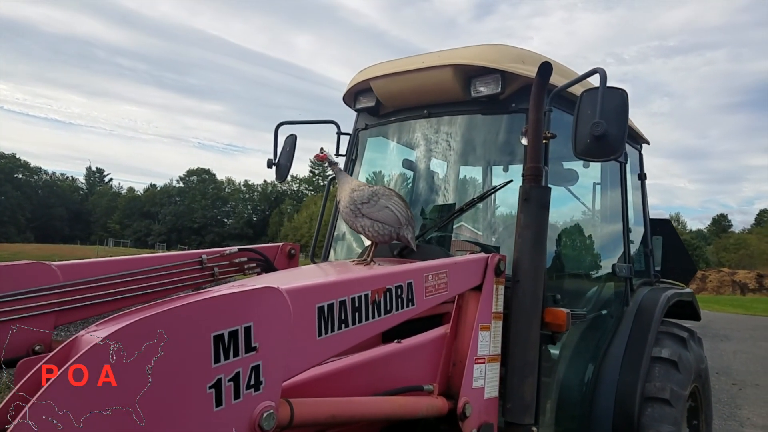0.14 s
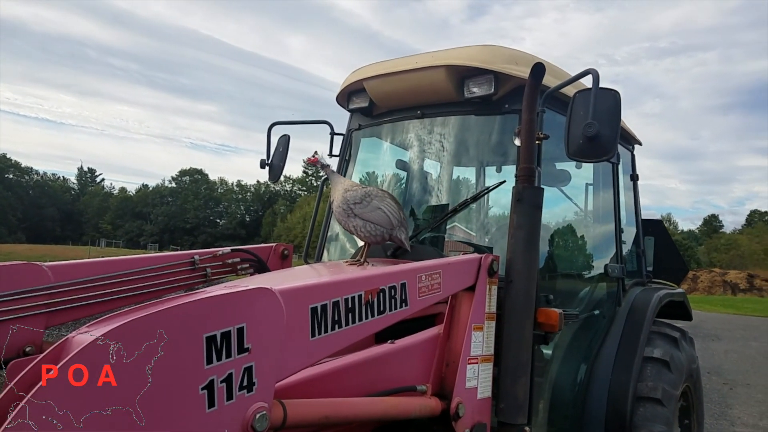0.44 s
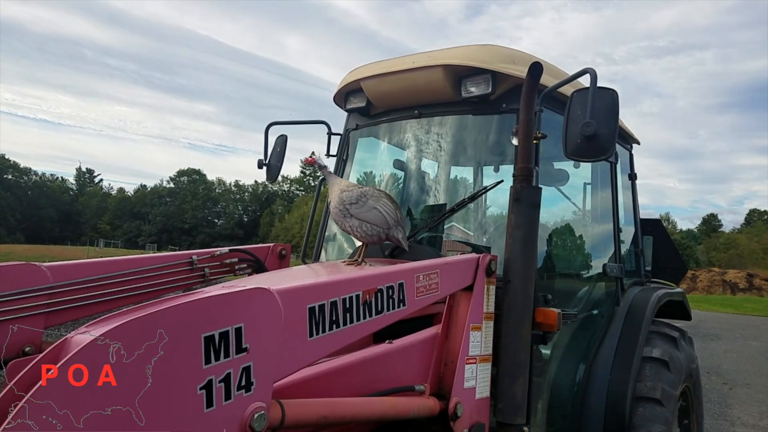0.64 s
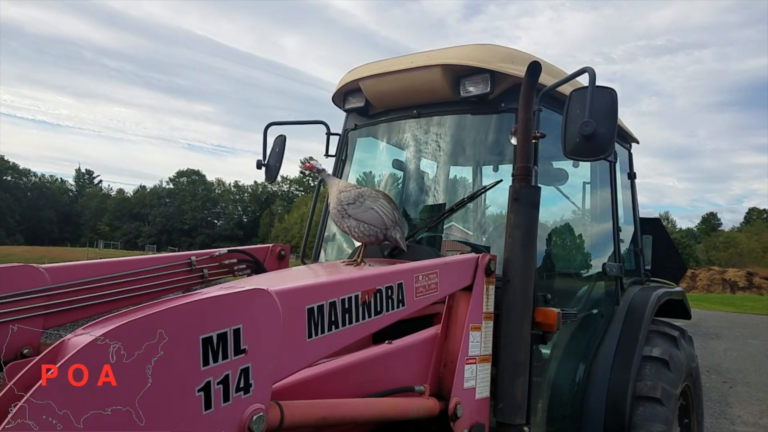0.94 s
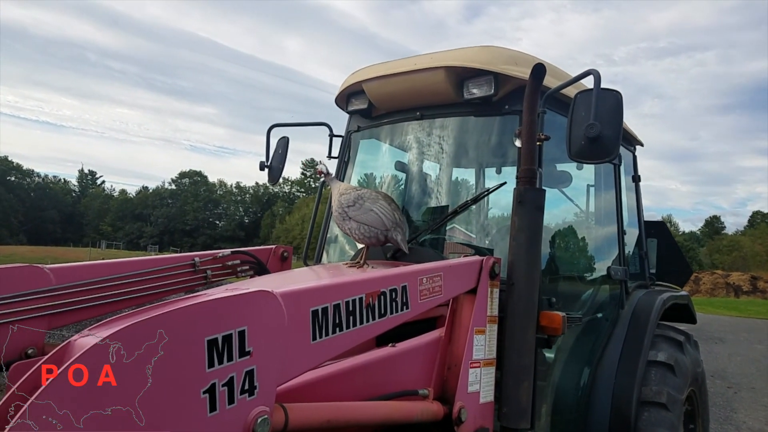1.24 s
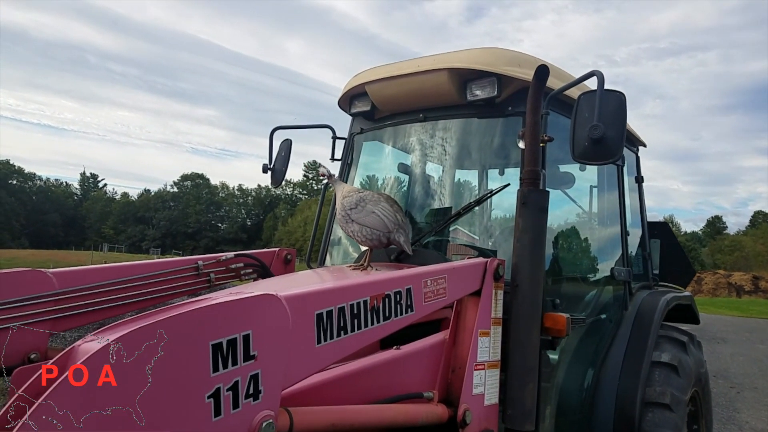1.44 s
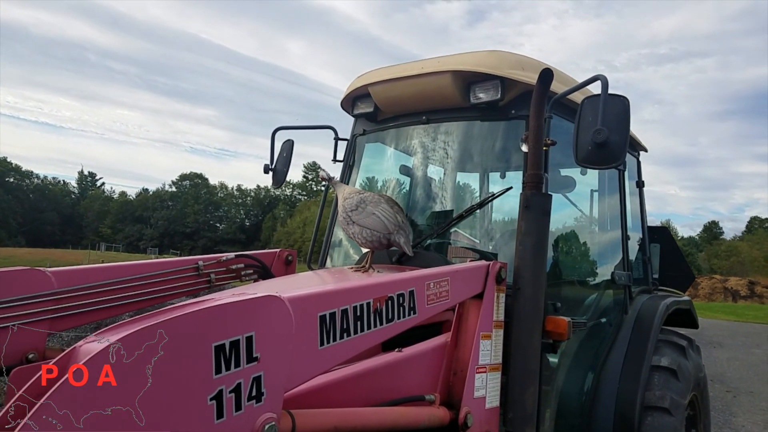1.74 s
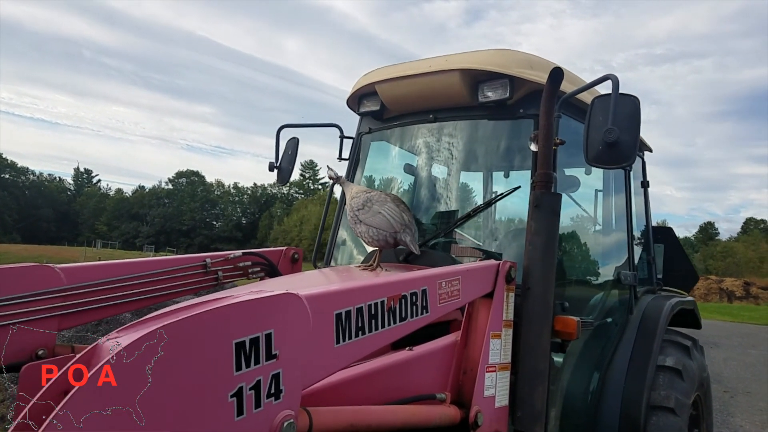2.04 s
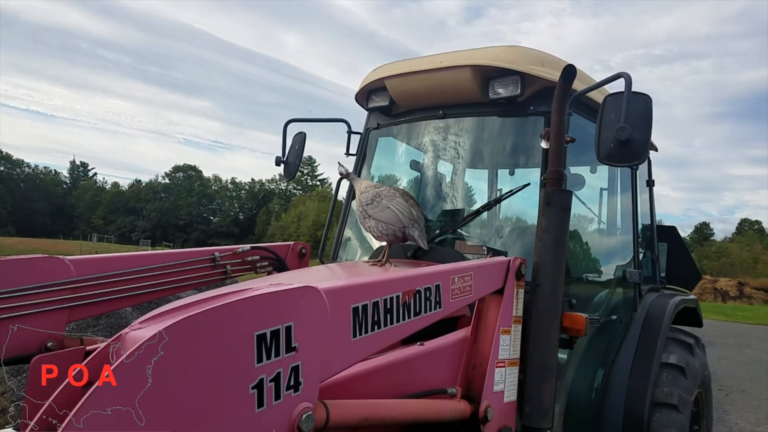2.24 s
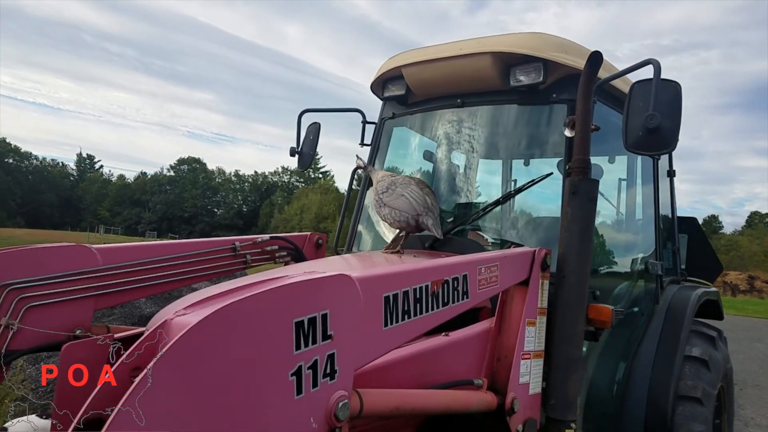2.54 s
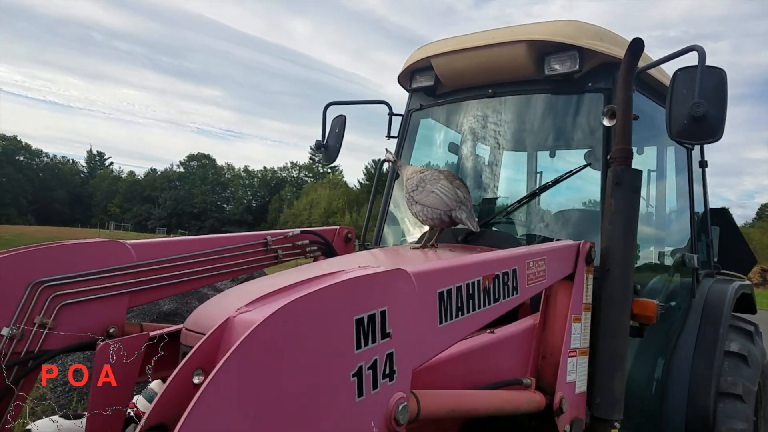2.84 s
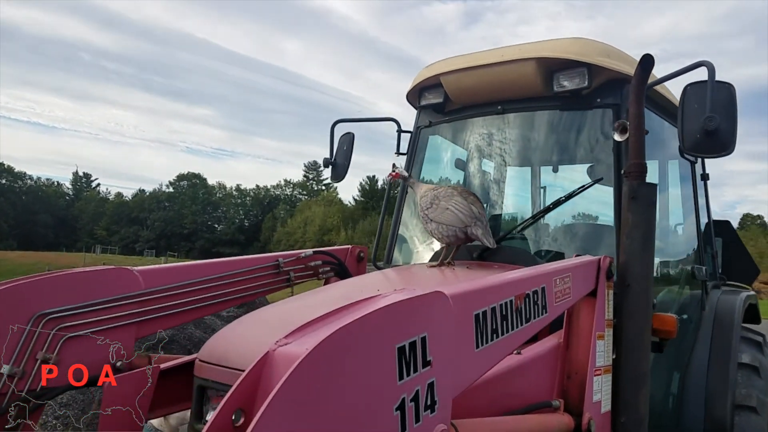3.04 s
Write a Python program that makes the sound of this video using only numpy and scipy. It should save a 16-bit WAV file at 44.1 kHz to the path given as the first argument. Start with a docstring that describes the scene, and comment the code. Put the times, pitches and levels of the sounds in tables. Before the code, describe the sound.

Single guinea hen calling outdoors in clipped, shrill, buzzy squawks, the first ones opening with a squeak; soft wind rumble nudges the stereo microphone mainly between calls in the first half, over a faint countryside hush.

```python
"""A guineafowl perched on a parked tractor gives eight short, harsh squawks.
Its voice has two oscillators, a high whistle and a low buzz that shakes it into a rasp, shaped by the throat.
Each call is led in by a hiss of air and opens on a falling squeak.
Cab and bonnet scatter the calls to the microphone's two ports, and the yard answers faintly.
A light wind nudges the microphone over a steady distant countryside hush with two faint ticks."""
import sys
import numpy as np
from scipy import signal
from scipy.fft import rfft, irfft, next_fast_len
from scipy.io import wavfile
from scipy.ndimage import map_coordinates

SR = 44100
rng = np.random.default_rng(int(sys.argv[2]) if len(sys.argv) > 2 else 0)


def persist_wave(psi):
    """Save psi, clipped to +-1, as 16-bit WAV."""
    counts = np.round(np.clip(psi, -1, 1) * 32767).astype(np.int16)
    wavfile.write(sys.argv[1], SR, np.atleast_2d(counts).T)


N = 141120  # samples, 3.2 s
T = np.arange(N) / SR
CALL_T = np.arange(SR // 6) / SR  # room for one squawk, s
OPPOSITE = np.array([[1], [-1]])  # a side signal enters the two ports in opposite sense


def undb(db):
    """Decibels to gain."""
    return 10 ** (np.asarray(db) / 20)


def unit(x):
    """Scale to rms 1."""
    return x / np.sqrt(np.mean(x ** 2) + 1e-18)


def ramp(x):
    """Smooth step from 0 to 1."""
    return np.sin(np.pi / 2 * np.clip(x, 0, 1)) ** 2


def bump(x, at, span):
    """Bell curve of height 1."""
    return np.exp(-((x - at) / span) ** 2)


def turn(hz):
    """Phase in radians of an oscillator following a pitch track."""
    return 2 * np.pi * np.cumsum(hz) / SR


def wobble(size, hz):
    """Smooth random motion of spread 1, with hz new random points a second."""
    at = np.arange(size) * hz / SR
    return unit(map_coordinates(rng.standard_normal(4096), [at], mode="wrap"))


def lowpass(x, hz):
    """Keep what lies below hz, without delay."""
    return signal.sosfiltfilt(signal.butter(2, hz, fs=SR, output="sos"), x)


def colour(x, points, extra=lambda f: 0):
    """Causal (minimum-phase) filter through (Hz, dB) points, with an optional further dB curve."""
    size = 2 * next_fast_len(x.shape[-1])
    f = np.arange(size // 2 + 1) * SR / size
    hz, db = np.array(points, float).T
    curve_db = np.interp(np.log(f + 1), np.log(hz), db) + extra(f)
    # folding the cepstrum onto positive time makes the filter causal
    cepstrum = irfft(np.log(undb(curve_db)))
    cepstrum[1:size // 2] *= 2
    cepstrum[size // 2 + 1:] = 0
    response = np.exp(rfft(cepstrum))
    return irfft(rfft(x, size) * response)[..., :x.shape[-1]]


def coloured_air(points):
    """Noise of rms 1, separate at each port, through (Hz, dB) points."""
    return unit(colour(rng.standard_normal((2, N)), points))


def level_over_call(x, db, length):
    """Set the level in dB, counting the energy over the call's length."""
    return undb(db) * unit(x) * np.sqrt(length * SR / len(x))


def add(out, x, start):
    """Mix a sound in at its start time, losing what falls before the beginning."""
    i = int(start * SR)
    x, i = x[max(-i, 0):], max(i, 0)
    out[i:i + len(x)] += x[:len(out) - i]


# colour of the escaping breath: pitch_hz, level_db
HISS_COLOUR = [(1500, -32.5), (2700, -21), (3300, -8.5), (4300, -9.5), (5000, -24.5), (12000, -39.5)]
HISS_LEAD_S, HISS_DB = 0.017, -41  # level before the fades


def hiss():
    """Air escapes just before the voice catches: a short faded burst of coloured noise."""
    t = np.arange(SR // 16) / SR
    breath = unit(colour(rng.standard_normal(len(t)), HISS_COLOUR))
    return undb(HISS_DB) * breath * ramp(t / 0.0052) * ramp((t[-1] - t) / .02)


SQUEAK_HZ, SQUEAK_FALL_HZ_PER_S, SQUEAK_JITTER = 3004, 9000, 0.037  # pitch at the peak; jitter as a share
SQUEAK_AT_S, SQUEAK_SPREAD_S = 0.012, 0.011


def squeak(squeak_db):
    """A brief falling, jittery tone that opens the call."""
    t = CALL_T
    falling = SQUEAK_HZ - SQUEAK_FALL_HZ_PER_S * (t - SQUEAK_AT_S)
    tone = np.sin(turn(falling * (1 + SQUEAK_JITTER * wobble(len(t), 1000))))
    swell = bump(t, SQUEAK_AT_S, SQUEAK_SPREAD_S) * ramp(t / .001)
    return np.sqrt(2) * undb(squeak_db) * tone * swell


ARCH_AT, ARCH_WIDTH, SAG_FROM, SAG_TO = .48, .2, .66, 1.1  # shares of the call's length
# pitch jitter as shares, the first two per unit roughness
JITTER, WHISTLE_JITTER, BUZZ_JITTER = 0.1006, .03, 0.03
JITTER_HZ = 894.8  # random points a second behind the rasp
SHAKE_RAD, SHAKE_DEPTH = .8, .7  # buzz on the pulses; the phase shake is per unit roughness
DOUBLING_RAD, DOUBLING_DEPTH = 0.85, .5
AIR_GAIN = 2 * undb(-11)  # noise among the pulses, per unit roughness


def oscillators(u, effort, hz, arch, drop, buzz_hz, rough):
    """The whistle's pitch arches and sags; the buzz shakes its pulses and alternate cycles grow unequal."""
    size = len(u)
    sag = 1 - drop * ramp((u - SAG_FROM) / (SAG_TO - SAG_FROM))
    pitch = hz * (1 + arch * effort) * sag
    clean = turn(pitch * (1 + WHISTLE_JITTER * rough * wobble(size, 400)))
    high = turn(pitch * (1 + JITTER * rough * wobble(size, JITTER_HZ)))
    low = turn(buzz_hz * np.sqrt(sag) * (1 + BUZZ_JITTER * wobble(size, 230)))
    # motion at half the whistle pitch makes alternate cycles unequal
    doubling = ramp(u / 0.35)
    shaken = high + SHAKE_RAD * rough * np.sin(low) + DOUBLING_RAD * doubling * np.sin(high / 2)
    gate = (1 + SHAKE_DEPTH * np.cos(low)) * (1 + DOUBLING_DEPTH * doubling * np.cos(high / 2))
    pulses = unit(sum(np.cos(k * shaken) for k in range(1, 12)))
    source = gate * (pulses + AIR_GAIN * rough * rng.standard_normal(size))
    return clean, low, source


# level of each buzz harmonic against the call's buzz_db: level_db
BUZZ_HARMONICS = [-4.5, -10.5]
# tones one buzz step below the whistle and one to three above, against SIDEBAND_DB: level_db
SIDEBANDS = [-8.5, -11, -8.5, -6]
SIDEBAND_DB = -25  # per unit roughness
WHISTLE_FADE_DB = 2  # fall over the call's length


def clear_tones(u, clean, low, whistle_db, buzz_db, rough, fade, push):
    """The plain whistle and buzz, with sidebands where the two oscillators combine."""
    whistle = undb(whistle_db - WHISTLE_FADE_DB * (u - .5)) * np.sin(clean)
    harmonics = enumerate(BUZZ_HARMONICS, start=1)
    buzz = undb(buzz_db) * sum(undb(db) * np.sin(k * low) for k, db in harmonics)
    steps = zip((-1, 1, 2, 3), SIDEBANDS)
    sidebands = sum(undb(db) * np.sin(clean + k * low) for k, db in steps)
    return np.sqrt(2) * (fade * (whistle + buzz) + undb(SIDEBAND_DB) * rough * push * sidebands)


# throat response: pitch_hz, level_db
THROAT_RESPONSE = [(300, -38.5), (520, -15), (680, -12.5), (820, -16.5), (1030, -7.5), (1170, -5),
                   (1290, -26), (1500, -15), (1700, -9), (1870, -5.5), (2000, -6), (2200, 4.5), (2560, 4),
                   (2770, -9), (3060, -0.5), (3360, -7.5), (3700, -1), (3950, -8.5), (4250, 6.5),
                   (4500, -12), (4850, -7.5), (5900, -14.5), (6750, -18.5), (9200, -20.5), (10200, -23),
                   (15500, -27.5)]
UPPER_HZ, UPPER_WIDTH_HZ, TREBLE_HZ = 4210, 908, 6050  # treble lift is complete at TREBLE_HZ
TREBLE_EFFORT_DB = 5.5  # treble lost at no effort


def throat_rasp(source, effort, push, upper_db, treble_db):
    """The throat filters the shaken pulses, brightest at full effort."""
    body = lowpass(source, UPPER_HZ)
    pressed = body + (source - body) * undb(TREBLE_EFFORT_DB * (effort - 1))

    def beak(f):
        upper = upper_db * bump(f, UPPER_HZ, UPPER_WIDTH_HZ)
        return upper + treble_db * ramp(2 * f / TREBLE_HZ - 1)

    return colour(pressed * push, THROAT_RESPONSE, beak)


RING_WIDTH_HZ = 220  # of each pass
LOW_RING_AT, LOW_RING_SPAN, HIGH_RING_SPAN = 0.67, 0.39, 0.32  # shares of the call's length


def throat_ring(source, hz):
    """A narrow throat resonance, applied twice for steep sides."""
    b, a = signal.iirpeak(hz, hz / RING_WIDTH_HZ, fs=SR)
    return unit(signal.lfilter(b, a, signal.lfilter(b, a, source)))


ATTACK_S, RASP_ATTACK_S = 0.002, .009
RELEASE_S, FADE_S = 0.02, 0.019  # fade-out before and after the nominal end


def squawk(length, hz, arch, drop, buzz_hz, rough, whistle_db, buzz_db, rasp_db, upper_db, treble_db,
           low_hz, low_db, high_hz, high_db, squeak_db):
    """A squeak opens the call, the buzz shakes the whistle into a rasp, and two throat rings swell in turn."""
    u = CALL_T / length
    effort = bump(u, ARCH_AT, ARCH_WIDTH)
    clean, low, source = oscillators(u, effort, hz, arch, drop, buzz_hz, rough)
    onset = ramp(CALL_T / ATTACK_S)
    release = ramp((length + FADE_S - CALL_T) / (RELEASE_S + FADE_S))
    push = np.sqrt(ramp(CALL_T / RASP_ATTACK_S)) * release
    rasp = throat_rasp(source, effort, push, upper_db, treble_db)
    high_ring = throat_ring(source, high_hz) * onset * bump(u, ARCH_AT, HIGH_RING_SPAN)
    low_ring = throat_ring(source, low_hz) * onset * bump(u, LOW_RING_AT, LOW_RING_SPAN)
    tones = clear_tones(u, clean, low, whistle_db, buzz_db, rough, onset * release, push)
    return (squeak(squeak_db) + tones
            + level_over_call(rasp, rasp_db, length)
            + level_over_call(high_ring, high_db, length)
            + level_over_call(low_ring, low_db, length))


# the bird's calls: start_s, length_s, whistle_hz, pitch_arch_share, final_pitch_drop_share, buzz_hz,
# roughness (0-1), whistle_db, buzz_db, rasp_db, upper_throat_db, treble_db,
# low_ring_hz, low_ring_db, high_ring_hz, high_ring_db, squeak_db
CALLS = [ (-.022, 0.063, 1443, 0.023, 0.092, 305.4, 0.6, -26, -43, -21.5, -5, -6, 2080, -33.5, 3504, -22.5, -23.5),
         (0.297, 0.07, 1514, 0.0051, 0.093, 348.4, 0.6, -25, -38, -19, -4, 1.5, 2200, -24.5, 3645, -24, -21),
         (0.721, 0.065, 1558, 0.07, 0.087, 347.2, 0.6, -28, -40, -17.5, 1, -2.5, 2144, -30, 3727, -24, -18.5),
         (1.736, 0.049, 1487, 0.0055, .03, 369.6, 0.34, -21, -46.5, -20, -2.5, 1, 2354, -25.5, 3670, -30.5, -34.5),
         (2.034, .062, 1461, 0.061, 0.095, 370.9, 0.58, -25.5, -46.5, -19.5, -1, 0.5, 2394, -27.5, 3516, -30.5, -47),
         (2.36, .063, 1555, 0.013, 0.059, 352.3, 0.67, -26, -49, -18, -0.5, -2, 2413, -35, 3596, -24, -36),
         (2.653, .072, 1496, 0.053, 0.073, 359.5, 0.76, -28.5, -49.5, -18, 0.5, -2, 2060, -27.5, 3520, -26.5, -42),
         (2.993, 0.06, 1487, 0.014, 0.017, 356.2, 0.61, -28.5, -41.5, -17.5, 0.5, 0.5, 2035, -29, 3670, -24, -45),
         ]


def guineafowl():
    """The bird up close and dry: each squawk is led in by a short hiss."""
    out = np.zeros(N)
    for start, *call in CALLS:
        add(out, squawk(*call), start)
        add(out, hiss(), start - HISS_LEAD_S)
    return out


PORT_LAG_S, LEFT_DB = .00005, -0.97  # second port's delay; first port's level


def direct_path(x):
    """The straight path: a little softer at the first port, a little later at the second."""
    f = np.arange(N // 2 + 1) * SR / N
    later = irfft(rfft(x) * np.exp(-2j * np.pi * f * PORT_LAG_S), N)
    return np.array([undb(LEFT_DB) * x, later])


def decay(t, t60):
    """Fall of 60 dB in t60 seconds."""
    return undb(-60 * t / t60)


# colour of the scatter off cab and bonnet: pitch_hz, level_db
TRACTOR_COLOUR = [(300, -22), (1400, -14.5), (2300, 0), (4000, -7.5), (7000, 2), (15000, 6.5)]
# how unlike the scatter is at the two ports: pitch_hz, level_db
SCATTER_UNLIKENESS = [(300, -19), (1500, -4), (2500, 0.5), (15000, -1)]
TRACTOR_T60_S, TRACTOR_DB = 0.063, 0.5  # level before colouring


def tractor_scatter(t):
    """Quick scatter from cab and bonnet: a short burst of decaying noise as impulse response."""
    mid, side = rng.standard_normal((2, len(t)))
    ports = mid + colour(side, SCATTER_UNLIKENESS) * OPPOSITE
    scatter = unit(ports * decay(t, TRACTOR_T60_S) * ramp(t / 0.0017)) / np.sqrt(SR)
    return undb(TRACTOR_DB) * colour(scatter, TRACTOR_COLOUR)


# colour of the yard's answer: pitch_hz, level_db
YARD_COLOUR = [(300, -8), (1200, -3), (1500, -6.5), (2200, -2.5), (2800, 0.5), (3700, -5.5), (4600, -0.5),
               (7000, 4), (15000, 5.5)]
YARD_T60_S, YARD_TREBLE_T60_S = 0.37, 0.26  # below and above about 5 kHz
YARD_DB, YARD_BUILD_S = -13.5, 0.013  # level before colouring


def yard_tail(t):
    """Faint reverberation that builds briefly, its treble dying sooner."""
    noise = rng.standard_normal((2, len(t)))
    dull = lowpass(noise, 5000)
    tail = dull * decay(t, YARD_T60_S) + (noise - dull) * decay(t, YARD_TREBLE_T60_S)
    tail = unit(tail * ramp(t / YARD_BUILD_S)) / np.sqrt(SR)
    return undb(YARD_DB) * colour(tail, YARD_COLOUR)


def farmyard(x):
    """Direct sound at two ports, quick scatter from the tractor, and a faint tail from the yard."""
    t = np.arange(SR) / SR
    echoes = tractor_scatter(t) + yard_tail(t)
    return direct_path(x) + signal.fftconvolve(x[None], echoes, axes=1)[:, :N]


# wind level along the take: time_s, level_db
WIND_LEVEL = [(0, -54), (.3, -54.5), (.42, -43), (.62, -41.5), (.74, -50.5), (.85, -49.5), (.96, -52),
              (1.24, -61.5), (1.35, -53.5), (1.75, -50), (2.1, -52.5), (2.5, -71.5), (3.2, -62.5)]
# wind colour: pitch_hz, level_db
WIND_RUMBLE = [(20, -16.5), (55, -7), (100, -2), (200, -12), (330, -17.5), (600, -27.5), (1200, -58),
               (5000, -76)]


def wind():
    """Low rumble of wind on the microphone, separate at each port, its level wavering."""
    level_db = np.interp(T, *np.array(WIND_LEVEL).T) + 2 * wobble(N, 18)
    return undb(level_db) * coloured_air(WIND_RUMBLE)


# colour of the distant countryside: pitch_hz, level_db
FIELD_COLOUR = [(25, -14.5), (80, -1), (160, -10), (400, -6), (700, -8), (950, -10.5), (1380, -20),
                (2120, -24), (7500, -39.5), (15500, -37.5)]
FIELD_DB, FIELD_SIDE_DB = -56, -1.5  # shared part; the opposed part relative to it


def field():
    """Steady distant hush, partly shared by the two ports."""
    mid, side = coloured_air(FIELD_COLOUR)
    return undb(FIELD_DB) * (mid + undb(FIELD_SIDE_DB) * side * OPPOSITE)


# wind buffets: peak_s, level_db
BUFFET_TIMES = [(0.516, -39), (0.661, -34.5), (0.836, -39.5), (0.882, -36.5), (1.101, -45), (1.204, -40),
                (1.236, -39.5), (1.409, -46.5), (1.604, -39)]
# buffet colour: pitch_hz, level_db
BUFFET_RUMBLE = [(20, -21), (60, 1), (120, 0.5), (230, -3), (350, -12), (600, -25.5), (1200, -47.5),
                 (5000, -80)]
BUFFET_SPREAD_S = 0.011


def buffets():
    """Brief swells of low noise on the microphone, slightly brighter than the wind's rumble."""
    swells = sum(undb(db) * bump(T, at, BUFFET_SPREAD_S) for at, db in BUFFET_TIMES)
    return swells * coloured_air(BUFFET_RUMBLE)


# faint ticks: start_s, level_db
TICK_TIMES = [(1.259, -64.5), (2.595, -48)]
# tick colour: pitch_hz, level_db
TICK_COLOUR = [(2000, -37), (5500, -13.5), (10000, -3.5), (15000, -9)]
TICK_DECAY_S = 0.015


def ticks():
    """Two bursts of bright noise, sudden at the start and dying exponentially."""
    gain = sum(undb(db) * (T > at) * np.exp(-abs(T - at) / TICK_DECAY_S) for at, db in TICK_TIMES)
    return gain * coloured_air(TICK_COLOUR)


def scene():
    """The bird in the yard, over wind and countryside."""
    return farmyard(guineafowl()) + wind() + field() + buffets() + ticks()


CEILING, TOP_HZ = 0.76, 16000  # level at which peaks round off; upper edge of the band


def record(dry):
    """The highest peaks are rounded off gently, and the recorder cuts the top."""
    rounded = dry / (1 + (dry / CEILING) ** 4) ** .25
    return signal.sosfilt(signal.ellip(10, .2, 80, TOP_HZ, fs=SR, output="sos"), rounded)


dry = scene()
out = record(dry)
persist_wave(out)
```